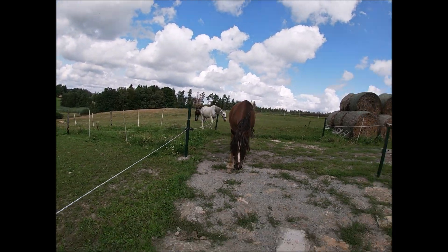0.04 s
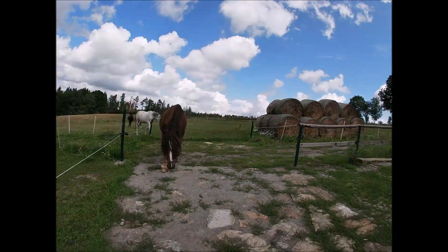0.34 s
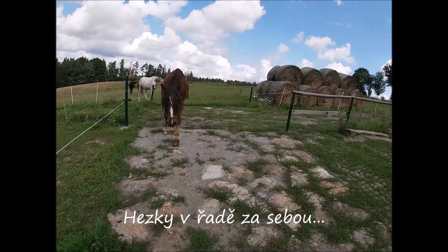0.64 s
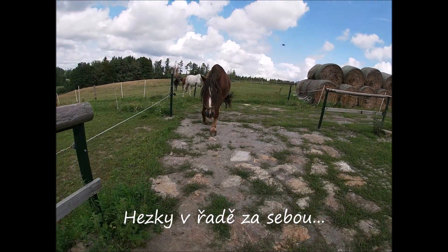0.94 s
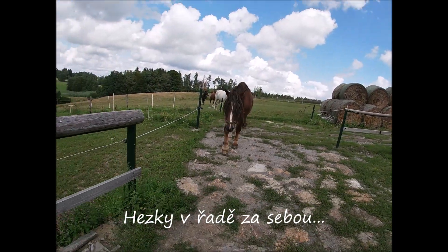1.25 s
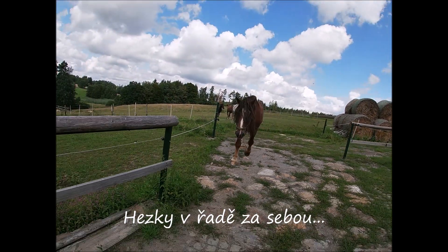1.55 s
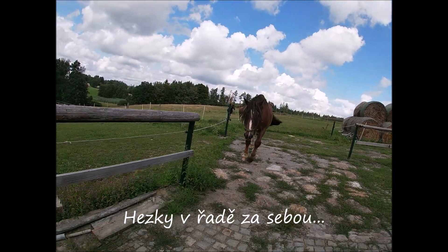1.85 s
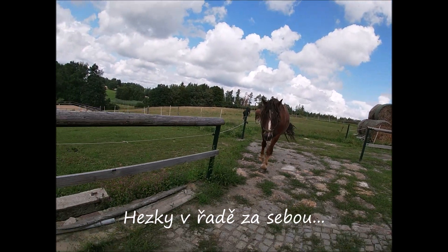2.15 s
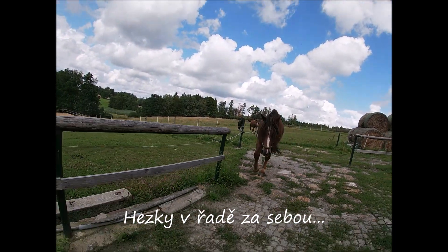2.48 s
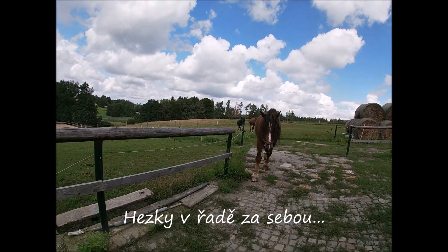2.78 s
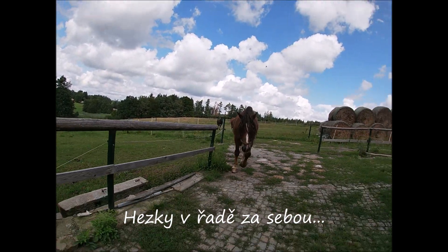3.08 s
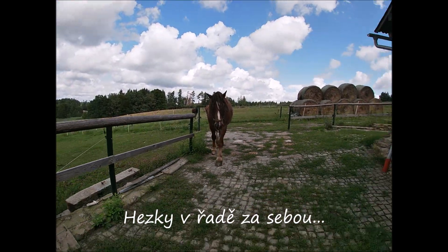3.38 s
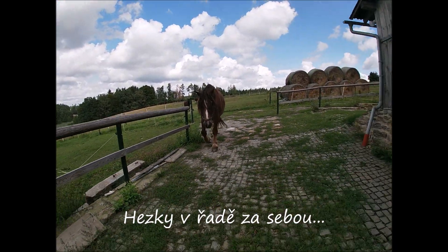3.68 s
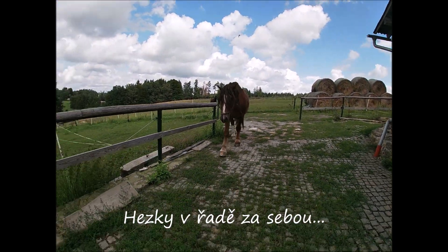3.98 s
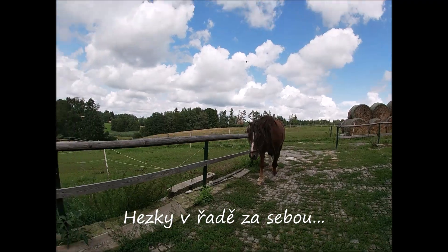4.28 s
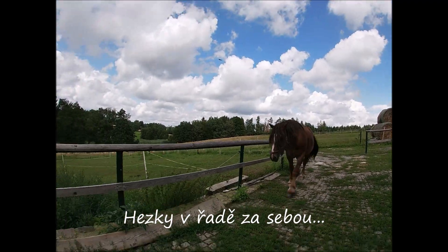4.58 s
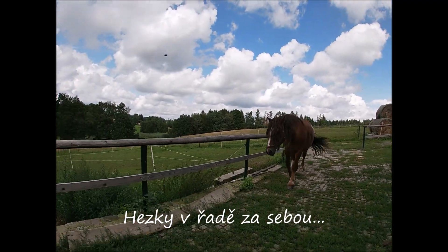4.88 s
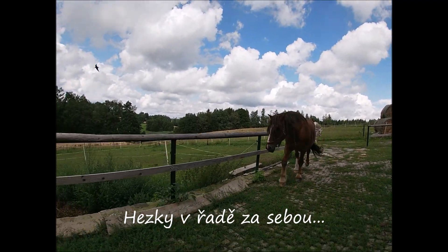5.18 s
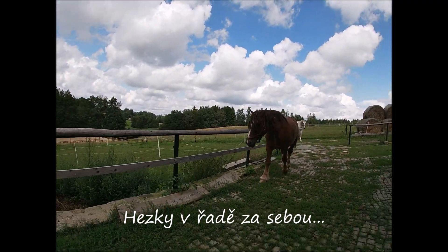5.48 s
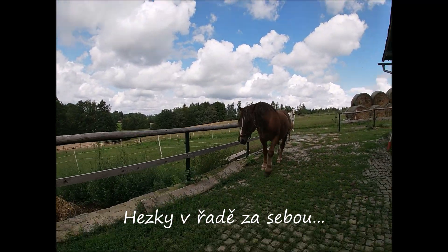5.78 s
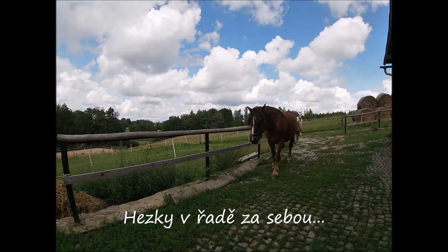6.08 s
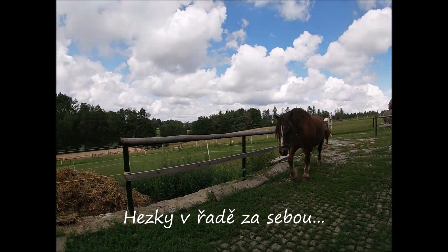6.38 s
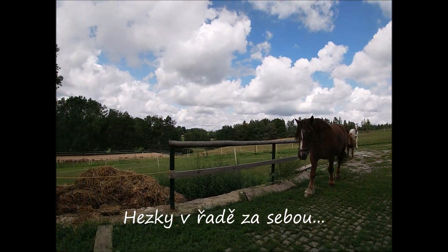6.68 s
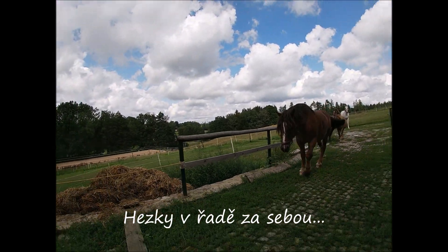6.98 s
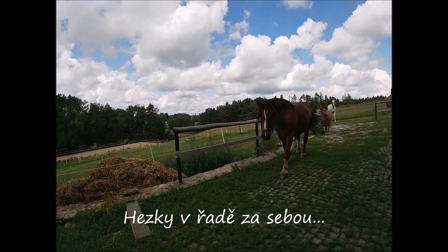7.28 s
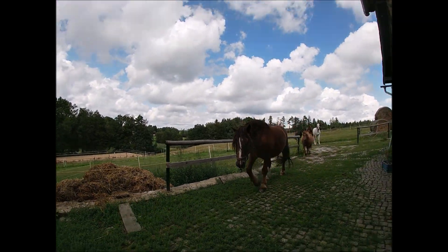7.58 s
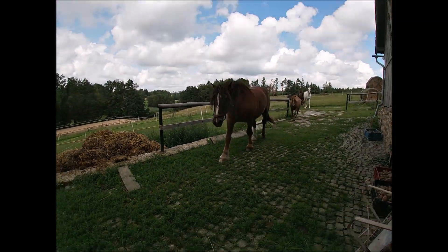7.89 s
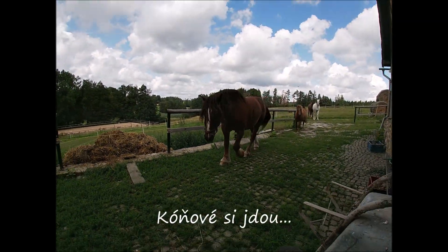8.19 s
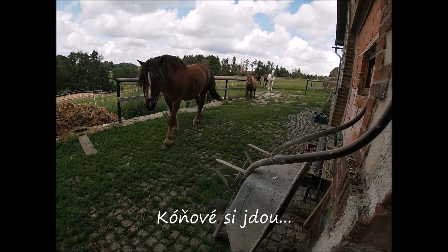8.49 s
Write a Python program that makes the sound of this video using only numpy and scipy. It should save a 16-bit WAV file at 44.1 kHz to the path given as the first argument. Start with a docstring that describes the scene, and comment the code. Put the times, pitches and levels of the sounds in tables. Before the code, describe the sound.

A horse walks over a grassy cobbled yard, close to a microphone carried along with it. A soft step opens, followed at about 0.3 seconds by a strong low gust and one sharp tap on the microphone. From 1.5 seconds the hoof knocks and footsteps grow clearer, landing roughly every two thirds of a second, each a hollow clop with a gritty crunch, some doubled. Firm steps stand out near 2.9, 3.5 and 4.2 seconds; they soften around 5 seconds, pick up again at 6, and are strongest at 8. Between them, feet brush lightly through grass and small stones and stalks snap. Wind rumbles and puffs unevenly on the microphone throughout, swelling around 3 to 3.5, 5.3 and 7.6 seconds. A soft open-air hiss, a weak yard echo and very faint, distant twittering birds lie behind everything until the end, at about 8.6 seconds.

```python
"""Hollow clops and gritty crunches: a horse walks over a grassy cobbled yard, led by someone carrying the
microphone. Each hoof or shoe clicks down on its edge and rolls onto its sole, crushing grit; stones and
stalks snap, and feet brush through the grass. Gusts rumble and puff on the microphone, and one knock
rings its housing. Behind it all are a weak yard echo, the hiss of open air and faint, far-off birds."""
import sys
import numpy as np
from scipy import signal
from scipy.fft import rfft, irfft, next_fast_len
from scipy.io import wavfile
from scipy.ndimage import uniform_filter1d

SR = 44100
rng = np.random.default_rng(int(sys.argv[2]) if len(sys.argv) > 2 else 0)


def pcm_store(signal):
    """Save signal as 16-bit PCM."""
    levels = np.round(np.clip(np.atleast_2d(signal), -1, 1) * 32767)
    wavfile.write(sys.argv[1], SR, levels.astype(np.int16).T)


N = 381465
TIME = np.arange(N) / SR

# hooves and shoes landing on stone: start_s, edge_db, edge_hardness (0-1), roll_s, sole_db, crunch_t60_s,
# tilt_db_per_octave, ring_hz, ring_strength_db, clack_hz, clack_strength_db, lowpass_hz
FOOTFALLS = [(.16, -10.5, 0.16, 0.022, -9.5, 0.022, -2.0, 800, 15, 3000, 10, 14000),
             (.84, -15, 0.2, 0.0061, -12.5, 0.14, 0.5, 3270, 5, 3300, 2.5, 12000),
             (1.515, -12.5, 0.5, 0.0063, -31, 0.047, -4, 790, -3, 3020, -1, 12000),
             (1.545, 0.5, 0.52, .0045, -7, 0.12, 0.5, 810, 13.5, 2800, 8.5, 14000),
             (1.622, -6, 0.66, 0.059, -12, 0.15, 0.5, 1430, 3, 3120, 3.5, 14000),
             (2.091, -2.5, 0.9, 0.01, -10.5, 0.25, -2.5, 564, 11.5, 3870, 11, 8000),
             (2.18, 0.5, 0.66, 0.0046, -12, 0.1, 0, 860, 9.5, 1950, 0, 5270),
             (2.8616, 3, 0.54, 0.012, -2.5, 0.066, 0, 950, 12.5, 2250, 9, 6600),
             (2.887, -6, 0.9, 0.0045, -15.5, .06, 1, 980, 23, 2300, 5, 6000),
             (3.517, -1, 0.62, 0.0054, -5.5, 0.12, 3, 910, 6.5, 2900, 13.5, 6940),
             (3.532, -11, 1, 0.0063, -32, 0.07, -2.5, 1000, -2, 2100, 22, 6500),
             (3.593, -12.5, 0.5, 0.01, -19.5, 0.14, -2.5, 900, 0.5, 2900, 9, 6000),
             (4.2154, 2.5, 0.73, 0.0097, -4, 0.096, 0, 1440, 6.5, 2770, 9.5, 4930),
             (4.542, -12, 0.1, 0.017, -5, 0.1, -1, 1010, 12, 2400, -3, 12000),
             (4.812, -5.5, 0.4, 0.0067, -5.5, 0.23, 0.1, 556, 5.5, 1950, 3, 4770),
             (5.155, -24, 0.7, 0.0038, -18.5, 0.073, -2.5, 2500, -7, 3000, 0, 14100),
             (5.484, -8.5, 0.46, 0.019, -11.5, 0.16, -1.5, 856, 14, 2600, 7.5, 7000),
             (5.585, -8.5, 0.5, 0.0039, -16.5, 0.083, -4, 1600, 27, 1970, 2, 5000),
             (6.05, -15, 0.3, 0.0053, -8, 0.2, 2, 1250, 16, 2800, 6, 6000),
             (6.065, -3.5, 0.46, 0.0038, -7, 0.14, 0.5, 1400, 10.5, 2830, 15, 6000),
             (6.086, -6, 0.54, 0.0057, -4.5, 0.35, 0.5, 1400, 7, 2900, 7, 6000),
             (6.742, -2.5, 0.84, 0.0072, -2, 0.13, 0, 1150, 7.5, 2600, 6, 4600),
             (7.357, -9, 0, 0.0067, -13, .08, -2, 800, 4, 2500, 11, 5500),
             (7.379, -3.5, 0.25, 0.006, -2, 0.11, -0.5, 880, 7.5, 2700, 7, 4800),
             (7.996, -7.5, 0.77, 0.019, -13.5, 0.067, 1, 1300, 1.5, 3230, 8.5, 7050),
             (8.027, 4, 0.62, 0.0032, 1, 0.089, -2, 925, 15.5, 1900, 3.5, 8000),
             (8.236, -4, 0.4, 0.02, -9, 0.22, -0.1, 1430, 13.5, 2900, 3, 7000),
             (8.392, -17, 0.02, .006, -22, 0.085, -7, 730, 7, 3000, 9, 12000)]
# the body tone all footfalls share: frequency_hz, gain_db
FOOTFALL_EQ = [(30, -13.5), (150, 17), (430, 4), (1000, -0.5), (2300, -4), (5400, -10)]
# the microphone's fading top end, on footfalls and snaps: frequency_hz, gain_db
MIC_EQ = [(5400, 3.5), (7000, -1.5), (8400, -4.5), (9500, -10), (11000, -18), (12800, -18), (15000, -53)]
# snaps and chinks of grit and stalks: start_s, level_db, pitch_hz
SNAPS = [(.241, -32, 1720), (.301, -31, 1080), (0.5748, -39, 1140), (0.88, -29.5, 3260), (0.91, -33, 3500),
         (1.549, -35, 8300), (1.917, -35.5, 3400), (2.0126, -37.5, 2100), (2.575, -34.5, 1400),
         (3.025, -37.5, 1200), (3.516, -17, 5500), (3.914, -37, 1160), (3.9997, -37.5, 1090),
         (4.5166, -36.5, 2330), (6.061, -33, 5450), (6.105, -33, 5500), (6.115, -24.5, 780),
         (6.755, -34, 8000), (7.255, -32, 2530), (7.262, -29.5, 9300), (7.279, -34, 3500),
         (7.284, -33, 1900), (7.298, -31.5, 2980), (7.304, -29.5, 9000), (7.458, -34.5, 690)]
# feet and clothing brushing over grass and grit: centre_s, length_s, rustle_db, swish_db
BRUSHES = [(0.063, 0.027, -46, -56), (0.185, 0.012, -54, -48), (0.262, 0.12, -43.5, -50.5),
           (0.424, 0.02, -52, -56), (0.51, 0.46, -51, -62), (0.58, 0.028, -51, -78),
           (0.956, 0.23, -49.5, -55), (1.267, 0.17, -53, -65.5), (1.466, 0.037, -48, -58),
           (1.55, 0.015, -37, -54), (2.118, 0.035, -44, -47.5), (2.401, 0.078, -50.5, -85),
           (3.097, 0.04, -48, -58), (3.27, 0.034, -50.5, -52.5), (3.437, 0.13, -52.5, -86),
           (3.864, 0.23, -54, -57), (4.376, 0.067, -51.5, -58), (4.628, 0.15, -49.5, -63.5),
           (5.19, 0.045, -51, -51.5), (6.306, 0.87, -56, -60), (7.275, 0.28, -51, -60),
           (7.435, 0.13, -52, -59), (7.76, 0.13, -51, -61), (8.306, 0.64, -54, -57.5)]
# the midrange rustle of grass and leaves: frequency_hz, level_db
RUSTLE_SPECTRUM = [(150, 9), (500, 1), (800, 1), (1300, -2.5), (2300, -5), (2850, -6), (3500, -10.5),
                   (6000, -22.5), (12000, -55)]
# their bright swish: frequency_hz, level_db
SWISH_SPECTRUM = [(1500, -26), (3000, 7), (4300, 5), (6000, 7.5), (7200, 5.5), (8400, 4.5), (9300, -6),
                  (10500, -10), (12500, -19.5), (14500, -21)]
# fine sand crackling under a brush: frequency_hz, level_db
SAND_SPECTRUM = [(1000, -0.5), (3000, 14), (8500, 8), (10000, -36), (13000, -18), (15000, -27)]
# coarser grit shifting underfoot: frequency_hz, level_db
GRIT_SPECTRUM = [(400, 1), (1100, 3), (2800, -11), (6000, -10), (9000, -32), (11000, -36)]
# the bed of wind on the microphone: time_s, level_db
WIND_BED = [(0, -47.5), (.8, -36), (1.3, -43.5), (1.88, -53), (2.3, -42.5), (2.8, -45.5), (3.2, -35),
            (3.8, -48), (4.12, -36.5), (4.44, -49), (4.8, -43.5), (5.0, -53.5), (5.6, -40), (6.1, -35.5),
            (6.6, -46.5), (7.1, -32), (7.92, -48), (8.25, -50), (8.64, -48)]
# gusts riding on that bed: crest_s, hold_s, level_db
GUSTS = [(0.318, 0.086, -21), (0.507, 0.082, -29), (0.842, 0.25, -33.5), (1.367, 0.26, -30),
         (2.005, 0.16, -31.5), (3.056, 0.028, -23), (3.216, 0.0057, -32.5), (3.403, 0.069, -25),
         (4.218, 0.015, -34), (4.589, 0.014, -34), (5.158, 0.011, -34), (5.277, 0.061, -25),
         (5.44, 0.19, -32), (6.171, 0.029, -26), (6.368, 0.14, -36), (6.74, 0.029, -33.5),
         (7.29, 0.076, -36), (7.555, 0.088, -23.5), (8.045, 0.12, -34.5), (8.48, 0.0093, -33)]
# the rumble of large eddies: frequency_hz, level_db
RUMBLE_SPECTRUM = [(15, 1), (30, 1.5), (62, 0.5), (90, -2.5), (130, -7), (180, -29.5), (260, -40),
                   (500, -90)]
# the flutter of small eddies: frequency_hz, level_db
FLUTTER_SPECTRUM = [(70, -11), (120, -1), (170, 7.5), (250, -5), (350, -31), (500, -29), (800, -29),
                    (2000, -71)]
# single strong eddies striking the microphone: centre_s, level_db, pitch_hz
PUFFS = [(0.304, -26, 273), (0.546, -31, 300), (0.849, -38, 253), (2.057, -21.5, 94.6), (2.111, -23, 62),
         (3.078, -28.5, 272), (3.262, -31.5, 156), (3.452, -22.5, 191), (3.564, -30, 191),
         (4.038, -37, 245), (4.234, -27, 91), (5.139, -33, 224), (5.582, -26.5, 134), (5.654, -30.5, 240),
         (5.97, -29.5, 188), (7.117, -31.5, 193), (7.325, -26, 72), (7.608, -19, 65.4), (8.278, -35.5, 180)]
# resonances of the microphone's housing: pitch_hz, level_db, t60_s
HOUSING_MODES = [(1230, -4, 0.013), (1704, -18, 0.0088), (2350, -25, 0.012), (2880, -14, 0.006),
                 (3850, -28, 0.023), (4400, -14.5, 0.0067), (5670, -12, 0.0026), (7750, -16.5, 0.0023)]
# the hiss of far grass and trees, with one brief dip midway: time_s, rustle_db, swish_db
BREEZE_BED = [(0.0, -57, -59.5), (.36, -67, -62), (.75, -68.5, -69), (1.15, -66.5, -66), (1.6, -58.5, -63),
              (2.9, -58, -59), (3.2, -61.5, -65), (3.6, -60, -60.5), (4.43, -57.5, -58), (4.49, -69, -71),
              (4.54, -59, -59), (8.65, -60.5, -58)]
# far birds twittering: centre_s, length_s, pitch_hz, level_db
TWITTERS = [(1.245, 0.39, 2800, -65), (1.907, 0.89, 2900, -61.5), (2.071, 0.59, 5640, -57),
            (2.695, 0.27, 2920, -65), (4.319, 0.2, 3000, -60), (4.821, 0.72, 2840, -64),
            (5.885, 0.11, 5270, -62), (7.102, 0.21, 2900, -69), (7.561, 0.12, 4500, -59),
            (7.789, 0.23, 5940, -57), (7.796, 0.47, 2800, -59.5), (8.155, 0.12, 6500, -56)]


def footfalls(ripple_db, ripple_hz, size=16384):
    """A foot clicks on its edge, then crunches onto its sole; both sound a hollow ring and a clack."""
    out, t, hz = np.zeros(N), np.arange(size) / SR, bins_hz(size)
    ring_octaves, clack_octaves = 0.52, 0.26  # half widths
    octaves = np.log2(np.clip(hz, 400, 6000) / 1480)  # distance from the tilt's pivot
    low_cut_db = -10 * np.log10(1 + (346 / (hz + 20)) ** 4)  # the edge alone is too light to thud
    for (start_s, edge_db, hardness, roll_s, sole_db, crunch_t60_s, tilt,
         ring_hz, ring_db, clack_hz, clack_db, lowpass_hz) in FOOTFALLS:
        eq = at_hz(FOOTFALL_EQ, hz) + at_hz(MIC_EQ, hz) + tilt * octaves
        eq -= 10 * np.log10(1 + (hz / lowpass_hz) ** 8)
        # the ring gathers nearby energy into one peak; a valley below makes the clop hollow
        skirt = bell(hz, ring_hz, 5 * ring_octaves)
        valley = bell(hz, ring_hz / 2 ** 0.91, ring_octaves)
        eq += ring_db * (bell(hz, ring_hz, ring_octaves) - 0.5 * skirt - 0.096 * valley)
        # ring and clack cancel in a notch between them
        notch_hz = ring_hz * (clack_hz / ring_hz) ** 0.59
        eq -= 0.61 * min(ring_db, clack_db) * bell(hz, notch_hz, 0.14)
        # every cobble adds weak, closely spaced resonances of its own
        eq += ripple_db * np.interp(hz / ripple_hz, np.arange(size), rng.uniform(-0.35, 1, size))
        edge_eq = eq + edge_db + low_cut_db + clack_db * bell(hz, clack_hz, clack_octaves)
        # the sole is a touch brighter, and its clack sits lower under the weight
        loaded_clack_hz = clack_hz / 2 ** 0.43
        sole_eq = eq + sole_db + 0.32 * octaves + clack_db * bell(hz, loaded_clack_hz, clack_octaves)
        edge = contact(t, t60_s=0.085, hardness=hardness, grains_per_s=1800, spread_db=0.5, press_s=2e-5)
        sole = contact(t, crunch_t60_s, hardness=0.12, grains_per_s=1500, spread_db=1.5, press_s=2e-5)
        add(out, start_s, resonate(settle(edge, bounce=0.7), edge_eq))
        add(out, start_s + roll_s, resonate(settle(sole, bounce=0.47), sole_eq))
    return out


def contact(t, t60_s, hardness, grains_per_s, spread_db, press_s):
    """A first press, then a dying shower of crushed grains; hardness shifts the weight to the press."""
    sizes = rng.standard_normal(len(t)) * from_db(spread_db * np.minimum(rng.exponential(1, len(t)), 4))
    grains = level_out(sizes * (rng.random(len(t)) < grains_per_s / SR), span_s=0.038)
    shower = unit_energy(grains * from_db(-60 * t / t60_s))
    press = t * np.exp(-t / press_s)
    share = min(hardness, 0.95)
    return np.sqrt(share) * press / press.sum() + np.sqrt(1 - share) * shower


def settle(push, bounce, max_lag_s=0.0005):
    """A foot never lands flat: it rocks into place, smearing the attack (an all-pass filter)."""
    lag = int(max_lag_s * rng.uniform(0.55, 1) * SR)
    feedback = np.zeros(lag + 1)
    feedback[0], feedback[-1] = 1, bounce
    return signal.lfilter(feedback[::-1], feedback, push + 1e-18)


def snaps(gain_db, slope_db_per_octave, size=4096):
    """Small stones and stalks give short clicks, loosely focused on a pitch."""
    out, t, hz = np.zeros(N), np.arange(size) / SR, bins_hz(size)
    for start_s, level_db, pitch_hz in SNAPS:
        eq = at_hz(MIC_EQ, hz) - slope_db_per_octave * np.abs(np.log2((hz + 50) / pitch_hz))
        crack = contact(t, t60_s=0.022, hardness=0.17, grains_per_s=2600, spread_db=6.0, press_s=1e-5)
        click = resonate(crack, eq)
        add(out, start_s, from_db(level_db + gain_db) * click / np.abs(click).max())
    return out


def grass_brushes(grain_db, grain_hz, sand_db, grit_db):
    """Each brush swells and fades, grainy from stalks and sand catching and letting go."""
    rustle_level, swish_level = np.zeros(N), np.zeros(N)
    for centre_s, length_s, rustle_db, swish_db in BRUSHES:
        near = np.abs(TIME - centre_s) < 2 * length_s
        swell = np.exp(-(2 * (TIME[near] - centre_s) / length_s) ** 2)
        rustle_level[near] += from_db(rustle_db) * swell
        swish_level[near] += from_db(swish_db) * swell
    grain = unit_rms(from_db(grain_db * drift(grain_hz)))
    sand = from_db(sand_db) * swish_level * crackle(SAND_SPECTRUM, grains_per_s=300)
    grit = from_db(grit_db) * rustle_level * crackle(GRIT_SPECTRUM, grains_per_s=130)
    grass = rustle_level * noise(RUSTLE_SPECTRUM) + swish_level * noise(SWISH_SPECTRUM)
    return grain * grass + sand + grit


def crackle(spectrum, grains_per_s, size=512):
    """Sparse clicks of sand or grit underfoot, rms 1."""
    click = resonate(signal.unit_impulse(size), at_hz(spectrum, bins_hz(size)))
    grains = rng.standard_normal(N) * (rng.random(N) < grains_per_s / SR)
    return unit_rms(signal.fftconvolve(grains, click)[:N])


def wind(rumble_gain_db, flutter_gain_db, burst_db, calm_db):
    """Large eddies rumble, deeper in the lulls; small ones break off in bursts on their crests."""
    level_db = gust_envelope(rise_db_per_s=294, fall_db_per_s=212) + 2.3 * drift(rate_hz=10.1)
    strength = np.clip((level_db - calm_db) / 20, 0, 1)
    eddies = noise(RUMBLE_SPECTRUM)
    deep = lowpass(eddies, cutoff_hz=24)
    rumble = level_out(strength * eddies + (1 - strength) * deep, span_s=0.0767)
    bursts = from_db(burst_db * np.minimum(np.abs(rumble), 2))
    flutter = unit_rms(level_out(noise(FLUTTER_SPECTRUM), span_s=0.057) * bursts)
    return from_db(level_db) * (from_db(rumble_gain_db) * rumble + from_db(flutter_gain_db) * flutter)


def gust_envelope(rise_db_per_s, fall_db_per_s):
    """The wind's contour in dB: each gust rises, holds and falls away over the bed."""
    bed_db, = automation(WIND_BED)
    power = from_db(bed_db) ** 2
    for crest_s, hold_s, level_db in GUSTS:
        below_db = np.maximum(rise_db_per_s * (crest_s - TIME), fall_db_per_s * (TIME - crest_s - hold_s))
        power += from_db(level_db - np.clip(below_db, 0, 100)) ** 2
    return 10 * np.log10(power)


def wind_puffs(gain_db, cycles, width_octaves, size=8192):
    """An eddy crossing the microphone's port gives one soft, low puff of a few cycles."""
    out, t, hz = np.zeros(N), (np.arange(size) - size / 2) / SR, bins_hz(size)
    for centre_s, level_db, pitch_hz in PUFFS:
        swell = np.exp(-(t * pitch_hz / cycles) ** 2)
        band = np.exp(-(np.log2((hz + 1) / pitch_hz) / width_octaves) ** 2) * pitch_hz / (hz + pitch_hz)
        puff = unit_energy(swell * irfft(rfft(rng.standard_normal(size)) * band))
        add(out, centre_s + t[0], from_db(level_db + gain_db) * puff * np.linalg.norm(swell))
    return out


def housing_knock(start_s, gain_db, attack_s, size=4096):
    """One hard tap sets the microphone's small case ringing for a few milliseconds."""
    out, t = np.zeros(N), np.arange(size) / SR
    ring = sum((-1) ** k * from_db(level_db - 60 * t / t60_s) * np.sin(2 * np.pi * pitch_hz * t)
               for k, (pitch_hz, level_db, t60_s) in enumerate(HOUSING_MODES))
    add(out, start_s, from_db(gain_db) * ring * (1 - np.exp(-t / attack_s)))
    return out


def yard_echo(send, gain_db, t60_s, build_s, damping_hz):
    """Weak, dull scatter from the barn wall and the fences."""
    t = TIME[:SR // 2]
    scatter = rng.standard_normal(len(t)) * from_db(-60 * t / t60_s) * (1 - np.exp(-t / build_s))
    tail = lowpass(unit_energy(scatter), damping_hz)
    return from_db(gain_db) * signal.fftconvolve(send, tail)[:N]


def breeze(rustle_gain_db, swish_gain_db, waver_db, waver_hz):
    """Air in far grass and trees makes a softly wavering hiss."""
    rustle_db, swish_db = automation(BREEZE_BED)
    rustle = from_db(rustle_db + rustle_gain_db + waver_db * drift(waver_hz)) * noise(RUSTLE_SPECTRUM)
    swish = from_db(swish_db + swish_gain_db + waver_db * drift(waver_hz)) * noise(SWISH_SPECTRUM)
    return rustle + swish


def birds(flutter_db, flutter_hz, half_width_share):
    """Thin, quick twitters, smeared by distance into narrow, fluttering bands of noise."""
    out, flutter = np.zeros(N), unit_rms(from_db(flutter_db * drift(flutter_hz)))
    for centre_s, length_s, pitch_hz, level_db in TWITTERS:
        near = np.abs(TIME - centre_s) < length_s / 2
        edges_hz = [pitch_hz * (1 - half_width_share), pitch_hz * (1 + half_width_share)]
        band = signal.butter(2, edges_hz, "band", fs=SR, output="sos")
        song = level_out(signal.sosfilt(band, rng.standard_normal(2 * SR)), span_s=0.016)
        swell = np.cos(np.pi * (TIME[near] - centre_s) / length_s)
        out[near] += from_db(level_db) * swell * song[:near.sum()]
    return out * flutter


def resonate(push, eq_db):
    """Causal (minimum-phase) response of a body with this spectrum to a push."""
    cepstrum = irfft(np.log(from_db(eq_db)))
    half = len(cepstrum) // 2
    cepstrum[1:half] *= 2
    cepstrum[half + 1:] = 0
    return irfft(rfft(push) * np.exp(rfft(cepstrum)))


def bell(hz, centre_hz, width_octaves):
    """The EQ shape of a resonance, 1 on top."""
    return 1 / (1 + (np.log2((hz + 1) / centre_hz) / width_octaves) ** 2)


def noise(spectrum):
    """Noise of a given colour, rms 1."""
    size = next_fast_len(N)
    colour = from_db(at_hz(spectrum, bins_hz(size)))
    return unit_rms(irfft(rfft(rng.standard_normal(size)) * colour, size)[:N])


def drift(rate_hz):
    """A smooth random modulator, rms 1."""
    return unit_rms(lowpass(rng.standard_normal(N + SR), rate_hz, order=2)[SR:])


def lowpass(x, cutoff_hz, order=1):
    """Roll off the top gently."""
    return signal.sosfilt(signal.butter(order, cutoff_hz, fs=SR, output="sos"), x)


def level_out(x, span_s):
    """Hold the level steady over a span, leaving the faster lumps."""
    return x / np.sqrt(uniform_filter1d(x ** 2, int(span_s * SR)) + 1e-9)


def automation(rows):
    """Each level column of a timed table, drawn out to every sample."""
    time_s, *columns = np.transpose(rows)
    return [np.interp(TIME, time_s, column) for column in columns]


def at_hz(spectrum, hz):
    """A spectrum's dB values, read on a log-frequency axis."""
    frequency_hz, level_db = np.transpose(spectrum)
    return np.interp(np.log(hz + 1), np.log(frequency_hz), level_db)


def bins_hz(size):
    """The frequencies of an FFT's bins."""
    return np.arange(size // 2 + 1) * SR / size


def add(out, start_s, sound):
    """Mix a sound in from a given moment."""
    i = max(round(start_s * SR), 0)
    out[i:i + len(sound)] += sound[:N - i]


def from_db(db):
    """Decibels to gain."""
    return 10 ** (np.asarray(db) / 20)


def unit_rms(x):
    """Scale to rms 1."""
    return x / np.sqrt(np.mean(x ** 2) + 1e-20)


def unit_energy(x):
    """Scale to the energy of one unit click."""
    return x / np.sqrt(np.sum(x ** 2) + 1e-20)


def scene():
    """The mono mix: feet up front, wind and a knock on the microphone, open air behind."""
    feet = footfalls(ripple_db=5.0, ripple_hz=111) + snaps(gain_db=0.5, slope_db_per_octave=11.0)
    knock = housing_knock(start_s=0.338, gain_db=4.0, attack_s=0.00057)
    gusts = wind(rumble_gain_db=2.0, flutter_gain_db=-13.5, burst_db=7.5, calm_db=-47.0)
    puffs = wind_puffs(gain_db=-0.5, cycles=2.71, width_octaves=0.76)
    air = breeze(rustle_gain_db=3.5, swish_gain_db=-2.5, waver_db=1.8, waver_hz=13.0)
    twitters = birds(flutter_db=4.0, flutter_hz=35, half_width_share=0.059)
    brushes = grass_brushes(grain_db=3.5, grain_hz=250, sand_db=-7.5, grit_db=-9.5)
    # the knock is right at the microphone, so little of it comes back from the yard
    echo = yard_echo(feet + from_db(-14) * knock, gain_db=-17, t60_s=0.22, build_s=0.043, damping_hz=5060)
    return (feet + brushes + gusts + puffs + knock + echo + air + twitters)[None]


def record(dry):
    """A steep high cut at 14.6 kHz."""
    return signal.sosfilt(signal.ellip(10, 0.1, 80, 14600, fs=SR, output="sos"), dry)


dry = scene()
out = record(dry)
pcm_store(out)
```